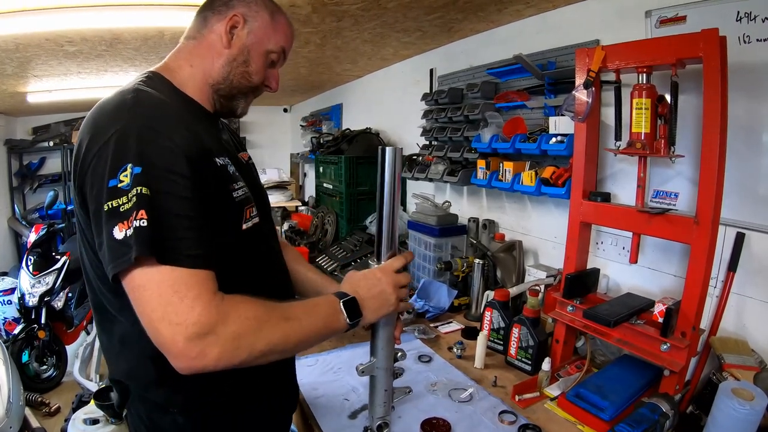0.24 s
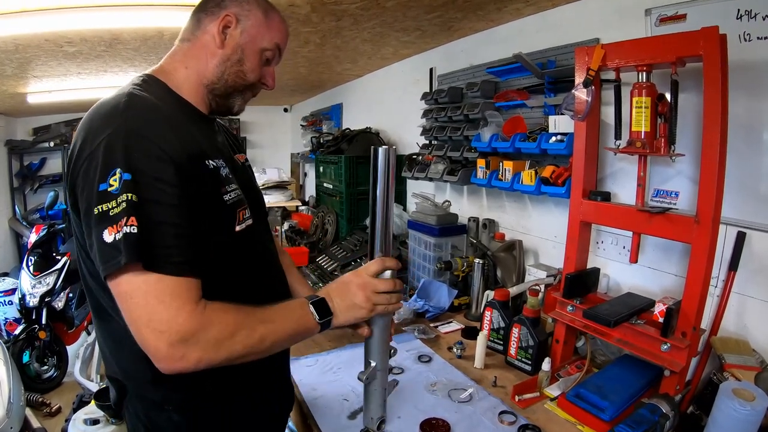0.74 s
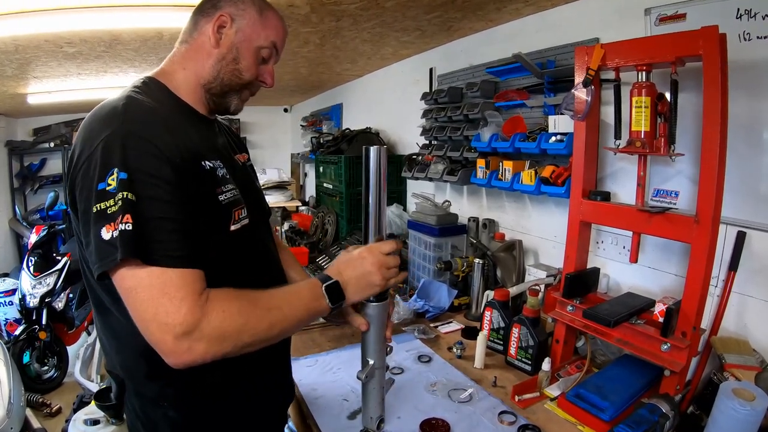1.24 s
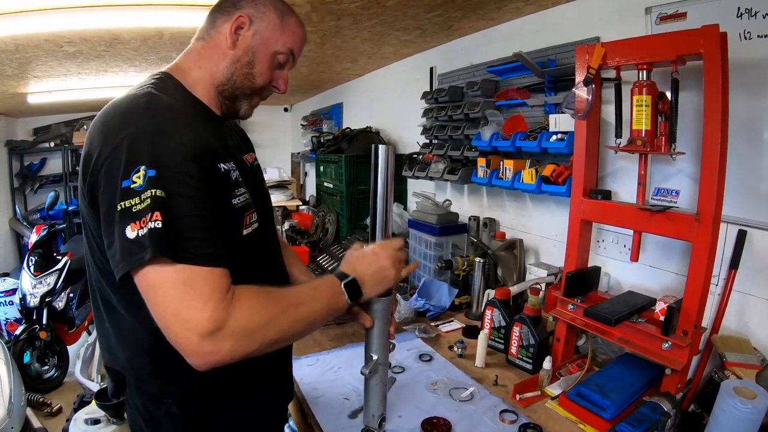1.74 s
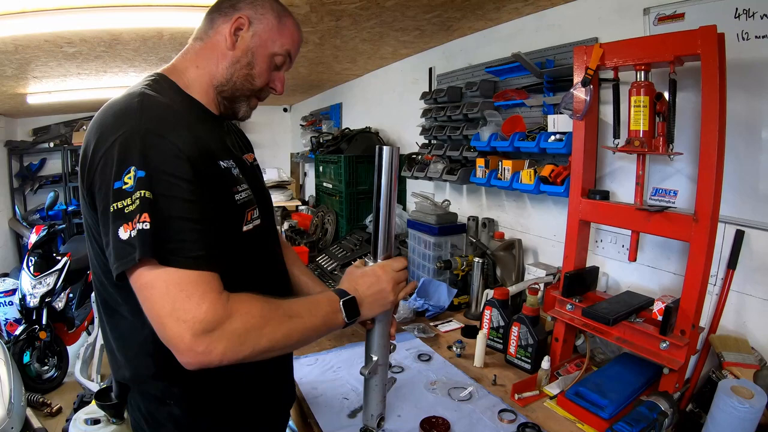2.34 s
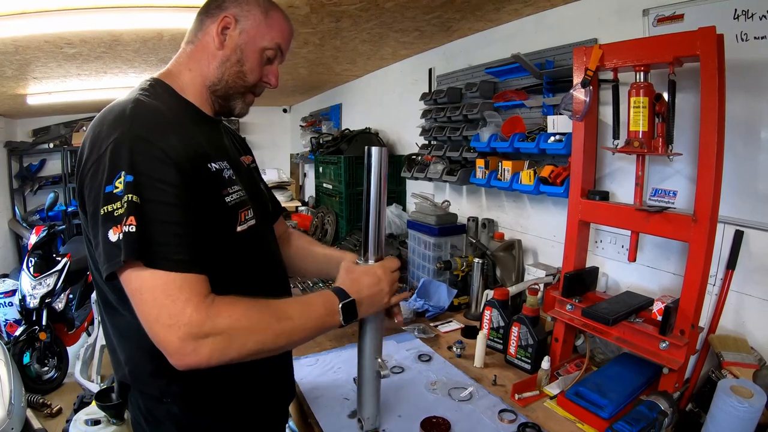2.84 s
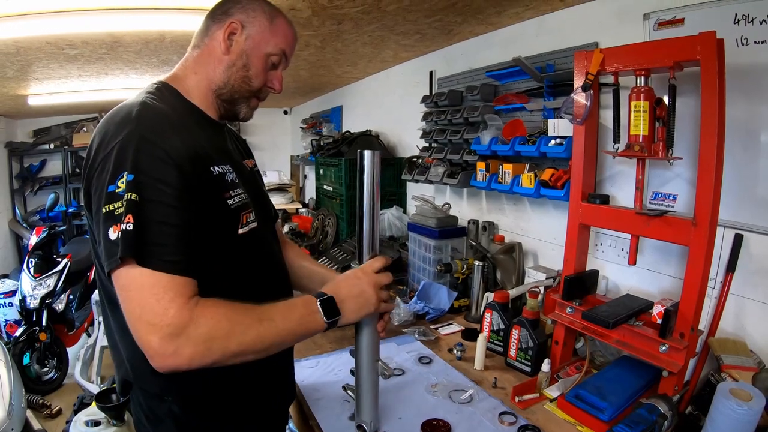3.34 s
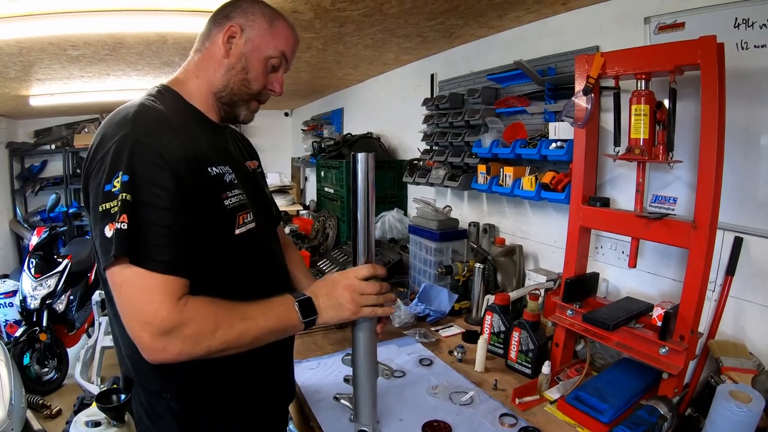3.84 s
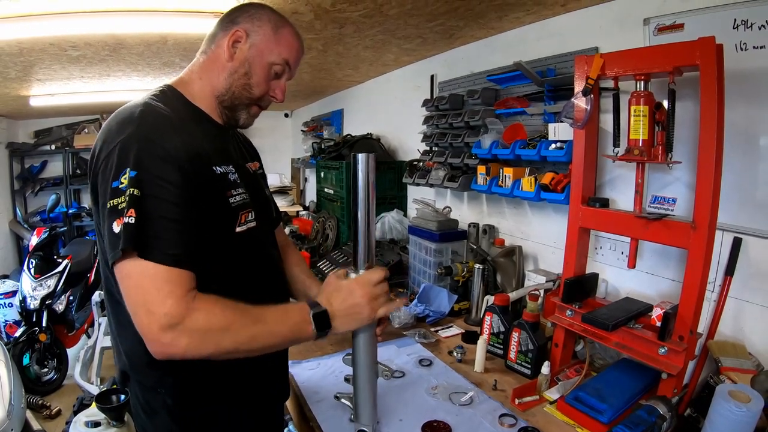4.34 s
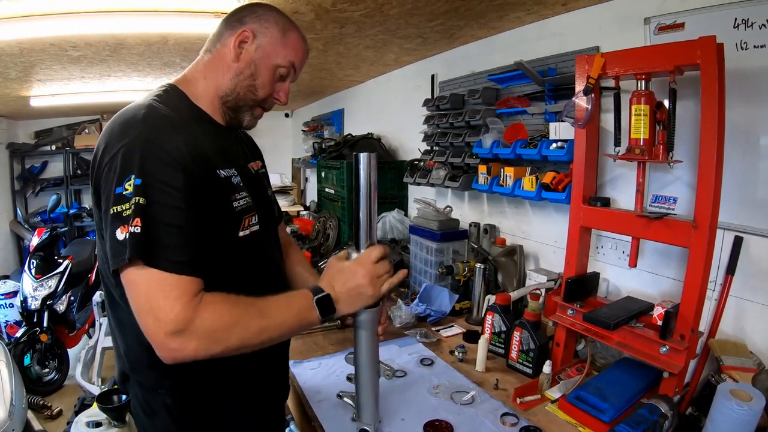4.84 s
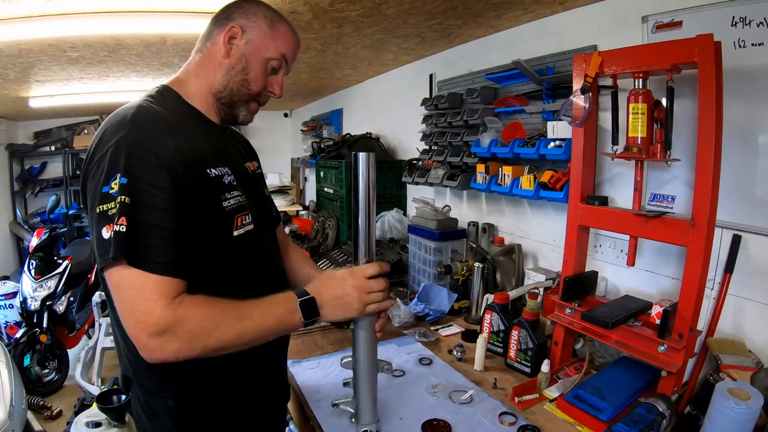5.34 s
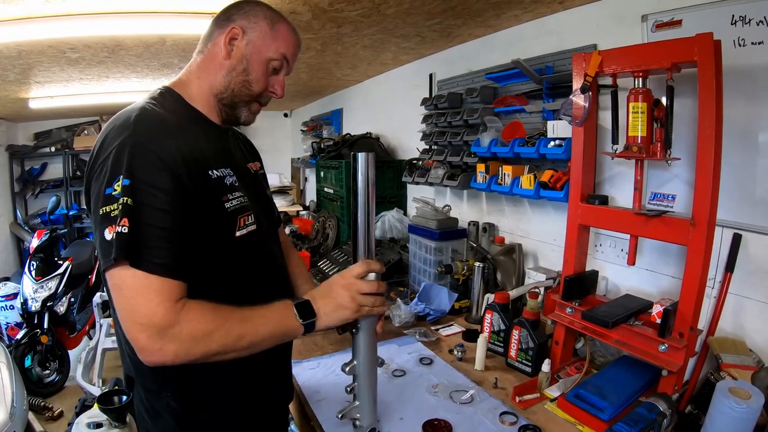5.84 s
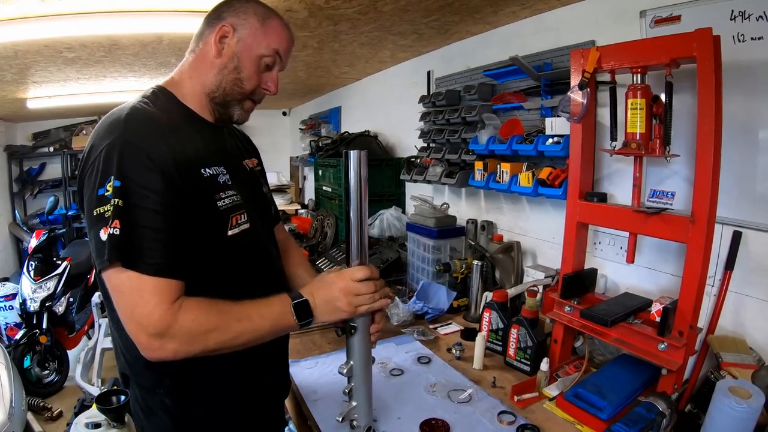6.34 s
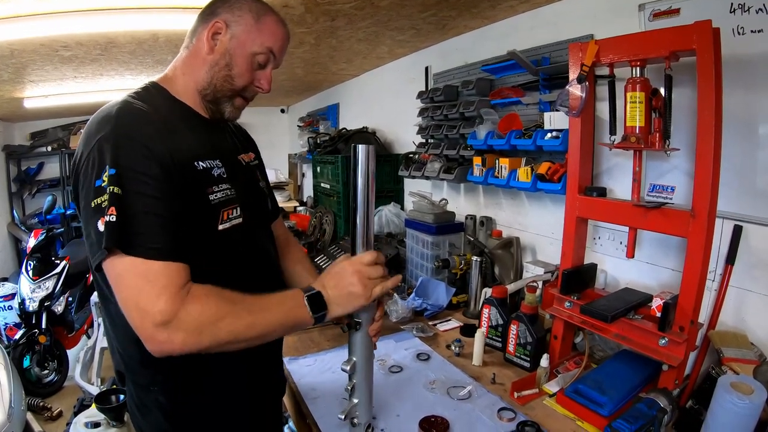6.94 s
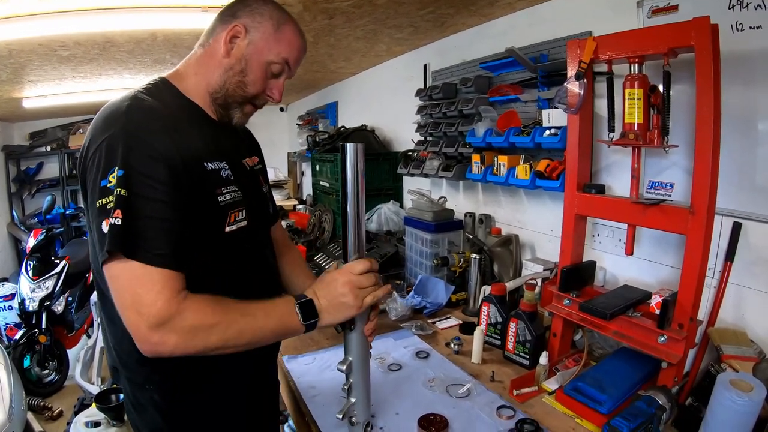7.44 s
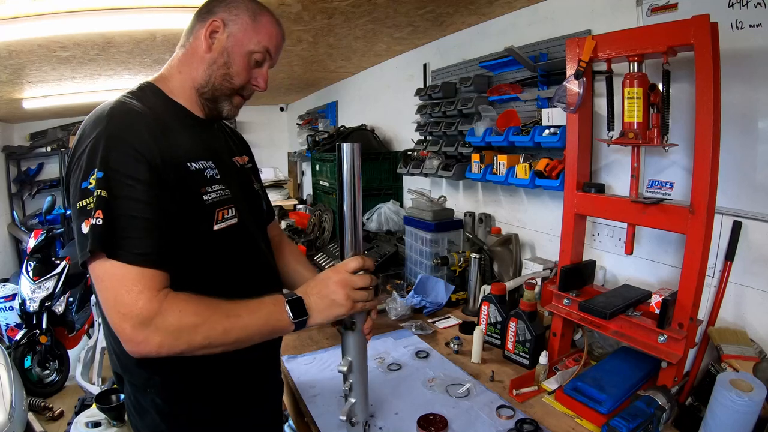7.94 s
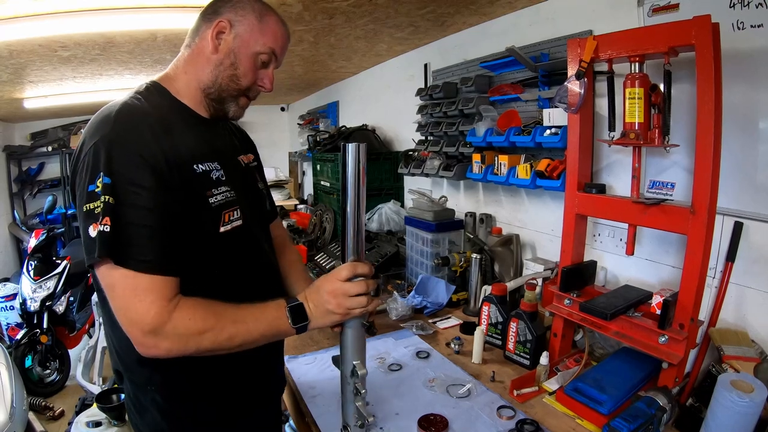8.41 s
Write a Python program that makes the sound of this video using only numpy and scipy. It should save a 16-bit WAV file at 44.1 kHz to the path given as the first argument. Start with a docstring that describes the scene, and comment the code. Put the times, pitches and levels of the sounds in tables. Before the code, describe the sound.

Hand tool work on a motorcycle fork: a tail of one slam and another hit, a pause, three quick slams, a lone softer one, three more, then two spaced hits. Each cracks sharply, thumps the bench and leaves a thin high ring. Metal rubs and clinks between; a tiny squeak comes near the end. Near microphone, small lively workshop.

```python
"""Driving a fork seal at the bench

A split metal seal driver is slid up a fork tube and slammed down on the seal; the fork stands on a wooden bench.
Each slam is a crack of shaped noise with ringing modes, a bench thump and a thin tube ring of decaying sines.
Upstrokes knock duller, the driver clinks and taps when handled: the same means, other colours and modes.
Hands rub on the metal and a finger squeaks, as swelling noise, over the low rumble of a small workshop."""
import sys
import numpy as np
from scipy import signal
from scipy.io import wavfile

SR = 44100
rng = np.random.default_rng(int(sys.argv[2]) if len(sys.argv) > 2 else 0)


def dump_mix(stems):
    """Bounce the given channels to the path in sys.argv[1] as a 16-bit WAV at rate SR."""
    frames = np.atleast_2d(stems).T  # one column per channel
    limited = np.clip(frames, -1, 1)  # hard clip at full scale
    pcm = np.round(limited * 32767).astype(np.int16)
    wavfile.write(sys.argv[1], SR, pcm)


N = 382655
LEAD = 4410   # samples run before time zero, so that a slam can fall just ahead of the start

# Slams on the seal; levels are relative, each source is trimmed later:
# start_s, blow_db, bench_thump_db, hardness_treble_db, tube_ring_db, leg_knock_db, favoured_pitch_hz
SLAM_CONTACTS = [(-0.07, -8.5, -17.5, -13, -51.5, -10, 6700), (0.24, -13.5, -21, -14.5, -53.5, -23.5, 1200),
                 (1.81, -13, -20, -12, -55.5, -17.5, 2220), (2.119, -13, -20.5, -13.5, -61, -29.5, 1240),
                 (2.414, -13, -21, -12.5, -61, -15.5, 1220), (3.367, -18.5, -25.5, -10, -47.5, -13, 640),
                 (4.546, -12, -18.5, -12, -48.5, -21.5, 2250), (4.831, -12.5, -21, -12.5, -49, -20, 1570),
                 (5.117, -13, -20.5, -12.5, -62, -15.5, 1575), (7.025, -12, -18, -11.5, -42.5, -20.5, 3100),
                 (7.615, -11, -20, -14.5, -38, -17, 1900)]
# Duller upstroke knocks, same columns
UPSTROKE_CONTACTS = [(0.168, -26.5, -27.5, -24, -62.5, -30.5, 964),
                     (2.033, -28.5, -30.5, -21.5, -67, -16, 960),
                     (2.334, -28.5, -28.5, -21.5, -61, -31, 990),
                     (4.763, -24.5, -26, -22, -61.5, -29.5, 990),
                     (5.061, -21.5, -25.5, -18.5, -67, -26.5, 925),
                     (7.528, -18.5, -21.5, -14, -38, -38, 1930)]
# Driver clinks on the tube, same columns
CLINK_CONTACTS = [(0.4095, -40.5, -65, -11, -75.5, -77, 6160),
                  (1.1605, -35.5, -54.5, -18.5, -68, -63, 2900), (3.3346, -39, -58, -10, -71, -56, 3040),
                  (4.4351, -27.5, -50.5, -10.5, -75.5, -65, 1960),
                  (5.407, -50.5, -58, -7.5, -71.5, -55, 5560), (5.6157, -40, -57.5, -6.5, -70.5, -54, 5620),
                  (6.9102, -19, -41.5, -4.5, -58.5, -43, 5800)]
# Soft dull taps on the slider, same columns
TAP_CONTACTS = [(1.174, -47, -50, -27, -75, -51, 740), (1.7376, -48, -66, -21, -75, -61, 1280),
                (4.048, -53, -56.5, -25.5, -80, -43, 874), (4.2316, -50.5, -70, -14.5, -75, -63.5, 1590),
                (6.362, -60, -53, -24.5, -75.5, -56, 700)]
# Colour of the dull contacts, upstrokes and taps: pitch_hz, density_db_per_hz
DULL_COLOUR = [(210, -37.5), (350, -2), (646, -2.5), (1020, -1.5), (1190, -5), (1400, -22), (1960, -1),
               (2240, -16.5), (3220, -18), (4190, -27.5), (5780, -24), (9780, -39.5), (11500, -64),
               (14900, -102), (22000, -120)]
# Modes of the cast slider, rung by slams, upstrokes and taps: pitch_hz, level_db, t60_s, sign
SLIDER_MODES = [(656.6, 0.5, 0.11, 1), (862, -8, 0.24, -1), (970, -1.5, 0.043, 1), (1192.4, -4.5, 0.12, -1),
                (1317, -6, 0.13, 1), (1714, -6, 0.044, -1), (1902, -6, 0.11, 1), (2205, -7.5, 0.14, -1),
                (3092, -3.5, .04, 1), (4490, -10.5, 0.04, -1), (5440, -9, 0.058, 1), (6840, -18.5, .03, -1),
                (7500, -16.5, 0.036, 1), (8160, -19, .03, -1)]


def amp(db):
    """Gain of a level in dB."""
    return 10 ** (np.asarray(db) / 20)


def rms_one(x):
    """Scale to rms 1."""
    return x / np.sqrt(np.mean(x ** 2) + 1e-20)


def at_hz(points, hz):
    """Read a spectrum on a log-frequency axis."""
    table = np.array(points)
    return np.interp(np.log(hz), np.log(table[:, 0]), table[:, 1])


def bands():
    """Third-octave band-passes with their centres, from 25 Hz up."""
    edges = 25 * 2 ** (np.arange(29) / 3)
    return [(np.sqrt(low * high), signal.butter(2, [low, high], "band", fs=SR, output="sos"))
            for low, high in zip(edges, edges[1:])]


def drift(rate_hz):
    """Slow random wander of spread 1: noise through two equal low-pass poles, drawn every 40 samples."""
    r = np.exp(-80 * np.pi * rate_hz / SR)
    draws = rng.standard_normal(N // 40 + 2002)
    slow = signal.lfilter([1], [1, -2 * r, r * r], draws)[2000:]   # skip the filter's start
    return np.interp(np.arange(N) / 40, np.arange(len(slow)), rms_one(slow))


def stereo(mid, side, hz):
    """One band at the stereo microphone: the side signal sets its width, a level difference its lean."""
    # Stereo width: pitch_hz, side_against_mid_db
    width = [(60, -26), (110, -23.5), (190, -23), (340, -14.5), (610, -5.5), (1090, -1), (1940, -2),
             (3460, -7.5), (6180, 0), (11000, 1)]
    # Balance: pitch_hz, left_against_right_db
    lean = [(60, 2.5), (110, 6.5), (190, 6.5), (340, -2.5), (610, -0.5), (1090, -1), (1940, -1.5),
            (3460, 0), (6180, -2.5), (11000, 1)]
    wide = amp(at_hz(width, hz)) * side
    half_lean_db = at_hz(lean, hz) / 2
    return np.array([mid + wide, mid - wide]) * amp(half_lean_db * np.array([[1], [-1]]))


def coloured(spectrum, patchy_db):
    """Stereo noise of rms 1, summed from bands that flicker partly together and partly alone."""
    white, together, out = rng.standard_normal((2, 2, N)), drift(8), 0
    for k, (hz, sos) in enumerate(bands()):
        flicker_db = patchy_db * (together + drift(14))
        noise = stereo(*signal.sosfilt(sos, white[k % 2]), hz)
        out = out + amp(at_hz(spectrum, hz) + flicker_db) * noise
    return rms_one(out)


def resonant_noise(peaks):
    """Noise of rms 1 heard through a few narrow resonances, each filtered twice."""
    out = 0
    for hz, width_hz, db in peaks:
        r = np.exp(-np.pi * width_hz / SR)
        poles = [1, -2 * r * np.cos(2 * np.pi * hz / SR), r * r]
        once = signal.lfilter([1, 0, -1], poles, rng.standard_normal(N))
        out = out + amp(db) * rms_one(signal.lfilter([1, 0, -1], poles, once))
    return rms_one(out)


def strike(rows, levels_db, modes, spread_db, tilt_db=0.0, favoured_hz=1.0):
    """One click train rings every damped mode, with a little chance in each strength; tilt is dB per octave."""
    # the spot that is struck lifts the modes near its favoured pitch
    favour_db, favour_octaves = 6, 0.11
    at = (np.array(rows)[:, 0] * SR).astype(int) + LEAD
    chance_db, out = rng.normal(0, spread_db, (len(rows), len(modes))), 0
    for k, (hz, db, t60, sign) in enumerate(modes):
        spot_db = favour_db * np.exp(-(np.log2(hz / favoured_hz) / favour_octaves) ** 2)
        mode_tilt_db = tilt_db * np.log2(hz / modes[0][0])
        clicks = np.full(N + LEAD, 1e-18)
        clicks[at] = amp(levels_db + db + spot_db + mode_tilt_db + chance_db[:, k]) * np.sign(sign)
        r, w = amp(-60 / (t60 * SR)), 2 * np.pi * hz / SR
        out = out + signal.lfilter([0, np.sin(w)], [1, -2 * r * np.cos(w), r * r], clicks)
    return out


def cracks(rows, colour, t60):
    """Each contact as a coloured noise burst (near sound) and one clean click of like energy (fills the room)."""
    favour_db, favour_octaves = 4, 0.2   # lift of the near crack around the favoured pitch
    start_s, crack_db, _, treble_db = np.transpose(rows)[:4]
    favoured_hz = np.array(rows)[:, 6:]
    length = 4096   # samples
    burst = rng.standard_normal((2, len(rows), length)) * amp(-60 * np.arange(length) / SR / t60)
    click_size = np.sqrt(np.sum(burst ** 2) / burst[..., 0].size)
    click = click_size * (np.arange(length) == 0) * np.ones((len(rows), 1))
    hardness_db = (treble_db - treble_db.mean())[:, None]   # a harder contact is brighter above 3 kHz
    near_only = np.array([1, 0])[:, None, None]
    shaped = 0
    for k, (hz, sos) in enumerate(bands()):
        spot_db = favour_db * np.exp(-(np.log2(hz / favoured_hz) / favour_octaves) ** 2) * near_only
        gain = amp(at_hz(colour, hz) + hardness_db * (hz > 3000) + spot_db)
        shaped = shaped + gain * signal.sosfilt(sos, [burst[k % 2], click * (-1) ** k])
    shaped = shaped / np.sqrt(np.mean(shaped[0, :, :512] ** 2))   # rms 1 over the near onsets
    out = np.zeros((2, N + LEAD + length))
    for k, start in enumerate((start_s * SR).astype(int) + LEAD):
        out[:, start:start + length] += amp(crack_db[k]) * shaped[:, k]
    return out[:, :N + LEAD]


def knocks(rows, colour, t60, crack_db, modes, ring_db, tilt_db):
    """Airborne part of a contact: the crack and the short ring of the struck part; the loose driver bounces twice."""
    chance_db = 3.5   # spread of mode strengths from touch to touch
    table = np.array(rows)
    blow_db, treble_db, favoured_hz = table[:, 1], table[:, 3], table[:, 6]
    tilt = tilt_db + (treble_db - treble_db.mean()) * 0.46   # high modes follow hardness
    ring = strike(table, blow_db + ring_db, modes, chance_db, tilt, favoured_hz)
    for late_s, bounce_db in [(0.005, -1.5), (0.012, -9)]:
        bounce = table[:, :1] + late_s * rng.uniform(0.51, 1.4, (len(table), 1))
        ring += strike(bounce, blow_db + ring_db + bounce_db, modes, chance_db, tilt, favoured_hz)
    return amp(crack_db) * cracks(rows, colour, t60) + ring


def slams():
    """The driver slams on the seal: a short hard crack and the ring of the cast slider."""
    # Slam colour: pitch_hz, density_db_per_hz
    slam_colour = [(210, -30), (350, 0), (449, -3.5), (973, -9), (1210, -8.5), (1490, -11.5), (2210, -15.5),
                   (2670, -22), (3130, -13.5), (3520, -21), (4190, -23.5), (8330, -19.5), (11500, -36.5),
                   (14900, -75.5), (22000, -120)]
    return knocks(SLAM_CONTACTS, slam_colour, t60=0.063, crack_db=-5.5,
                  modes=SLIDER_MODES, ring_db=-18.0, tilt_db=0.0)


def bench(rows, tilt_db):
    """Contacts knock the fork leg, then thump the bench modes; a softer push favours the low ones."""
    # Bench top and fork leg: pitch_hz, level_db, t60_s, sign
    bench_modes = [(59, -6, 0.4, -1), (71.4, -8.5, 0.93, 1), (82.24, 1.5, 0.38, 1), (101.75, -1.5, 0.35, 1),
                   (117.95, -3.5, 0.49, -1), (134.7, -1.5, 0.49, -1), (154.7, -4.5, 0.4, -1),
                   (175.2, -1, 0.33, 1), (201.6, -4, 0.41, 1), (216.4, -0.5, 0.27, -1),
                   (245.2, 8.5, 0.078, -1), (294.2, -13.5, 0.5, -1), (316, -18, 0.21, 1),
                   (347.6, -22.5, 0.37, 1), (384.4, -31, .27, 1), (416, -7, 0.055, -1),
                   (436.2, -4.5, 0.093, -1), (493, -22, 0.084, 1), (635, -18, 0.044, -1),
                   (639, -22, 0.24, 1)]
    # Short knock of the fork leg: pitch_hz, level_db, t60_s, sign
    leg_modes = [(208, -4.5, 0.0077, 1), (427, -11, 0.05, -1)]
    bench_delay_s = 0.003045   # the blow needs this long to push through fork and foot
    table = np.array(rows)
    thump = strike(table[:, :1] + bench_delay_s, table[:, 2], bench_modes, 1.0, tilt_db)
    leg_knock = strike(table[:, :1] + 0.0018, table[:, 5], leg_modes, 0.5)
    return signal.sosfilt(signal.butter(2, 1200, fs=SR, output="sos"), thump + leg_knock)


def tube():
    """The long fork tube keeps a thin ring of decaying sines; the next slam or upstroke stops it and starts its own."""
    # Ring of the tube: pitch_hz, level_db, t60_s
    tube_modes = [(2718, -4, 1.55), (3591, -25, 1.1), (6690, -30, 1.0)]
    grip_s, grip_db_per_s = 7.28, 68.5   # a hand closes round the tube and damps its ring
    t, out = np.arange(N) / SR, np.zeros(N)
    blows = np.sort([row[0] for row in SLAM_CONTACTS + UPSTROKE_CONTACTS] + [N / SR])
    contacts = np.array(SLAM_CONTACTS + UPSTROKE_CONTACTS + CLINK_CONTACTS)
    for start_s, ring_db in contacts[:, [0, 4]]:
        end_s = blows[blows > start_s][0]
        now = (t >= start_s) & (t < end_s)
        age_s = t[now] - start_s
        grip_db = grip_db_per_s * np.maximum(t[now] - grip_s, 0) * (start_s < grip_s < end_s)
        for hz, db, t60 in tube_modes:
            out[now] += amp(ring_db + db - grip_db - 60 * age_s / t60) * np.sin(2 * np.pi * hz * age_s)
    return out * amp([[-1.5], [1.5]])   # leans right


def workshop(near, filling, wet_db, gap_s):
    """Direct sound, one sample earlier on the left, plus a dense noise tail that dies band by band."""
    # Decay of the room: pitch_hz, t60_s
    room_t60 = [(50, 1), (130, 0.29), (350, 0.36), (920, 0.4), (2430, 0.38), (6400, 0.36)]
    t = np.arange(SR * 3 // 4) / SR
    white, response = rng.standard_normal((2, 2, len(t))), 0
    for k, (hz, sos) in enumerate(bands()[10:]):   # from about 250 Hz up
        tail_db = wet_db - 2.14 * np.log2(hz / 1000) - 60 * t / at_hz(room_t60, hz)
        envelope = amp(tail_db) * (1 - np.exp(-t / gap_s))   # the tail builds up over the gap
        response = response + stereo(*signal.sosfilt(sos, white[k % 2]) * envelope, hz)
    direct = np.array([near[LEAD:], near[LEAD - 1:-1]]) * amp([[-1.2], [1.2]])
    return direct + signal.oaconvolve(filling[None], response, axes=1)[:, LEAD:LEAD + N]


def room_background():
    """Low rumble and drone as resonant noise, and a broad room tone, each following its own level over time."""
    # Room between the knocks: time_s, rumble_db, drone_db, tone_db
    room_levels = [(0.55, -47, -60, -60), (0.96, -56.5, -64, -57), (1.27, -46.5, -63, -58),
                   (1.65, -49, -66, -54.5), (2.749, -47, -60.5, -59.5), (3.03, -57, -73, -57.5),
                   (3.299, -59.5, -62, -59), (3.749, -75, -65.5, -59), (4.1, -58, -58.5, -56),
                   (4.35, -69, -68.5, -55.5), (5.5, -51, -64.5, -59.5), (5.9, -53.5, -69, -61.5),
                   (6.36, -48, -69, -55), (6.76, -59, -65.5, -54.5), (7.45, -47.5, -60, -57),
                   (8.0, -56, -60, -60.5), (8.3, -58, -66.5, -58), (8.677, -66.5, -67, -57)]
    # Low rumble: pitch_hz, width_hz, level_db
    rumble_peaks = [(62, 17, -6.5), (87.7, 3.1, 1), (101, 5.8, -9.5)]
    # Drone: pitch_hz, width_hz, level_db
    drone_peaks = [(202.9, 9.4, 1.5), (240, 55, -13.5), (283, 11, -9.5), (387, 23, -8)]
    # Room tone: pitch_hz, density_db_per_hz
    tone_colour = [(15, -42), (25, -7), (64, -2), (94, -1.5), (141, -12), (207, -9), (505, -24), (740, -17),
                   (2270, -27), (2780, -28.5), (8100, -47), (9930, -58), (11000, -66.5), (14300, -91),
                   (22000, -120)]
    time_s, rumble_db, drone_db, tone_db = np.transpose(room_levels)

    def level(db):
        """Gain over time, drawn straight in dB between the points."""
        return amp(np.interp(np.arange(N) / SR, time_s, db))

    rumble = level(rumble_db) * resonant_noise(rumble_peaks)
    drone = level(drone_db) * resonant_noise(drone_peaks)
    tone = level(tone_db) * coloured(tone_colour, patchy_db=0.7)   # nearly steady
    return rumble + drone + tone


def upstrokes():
    """Duller knocks of the upstroke: a longer, softer crack and the slider's ring with its top held down."""
    return knocks(UPSTROKE_CONTACTS, DULL_COLOUR, t60=0.11, crack_db=-4.0,
                  modes=SLIDER_MODES, ring_db=-9, tilt_db=-4.0)


def clinks():
    """The driver clinks on the tube: a light crack and the short ring of its two halves."""
    # Clink colour: pitch_hz, density_db_per_hz
    clink_colour = [(290, -50.5), (500, -23.5), (1520, -15), (2010, 0.5), (2480, -14), (4530, -15),
                    (5890, -17.5), (6540, -26), (10600, -27.5), (11500, -75.5), (14900, -105),
                    (22000, -120)]
    # Driver halves, damped by the hand: pitch_hz, level_db, t60_s, sign
    driver_modes = [(1260, -19.5, .05, 1), (1820, 0.5, 0.048, -1), (1926, -1.5, 0.028, 1),
                    (2090, 2, 0.057, -1), (2890, -7, 0.097, 1), (3380, -8, 0.079, -1),
                    (3880, -13.5, 0.062, 1), (4600, -25, 0.081, -1), (5560, -4, 0.065, 1),
                    (5680, -8.5, 0.13, -1), (5857, -3, 0.086, 1), (6120, -7, 0.066, -1),
                    (6200, -12, .06, 1)]
    return knocks(CLINK_CONTACTS, clink_colour, t60=0.11, crack_db=-12.0,
                  modes=driver_modes, ring_db=-10, tilt_db=-2.0)


def strokes():
    """Gains of rub and singing: each stroke swells and fades like a bell curve."""
    # Hands and driver rub along the tube: loudest_s, rise_s, fall_s, rub_db, metal_singing_db
    rub_strokes = [(0.841, .05, 0.06, -70.5, -82), (1.26, 0.033, .04, -66, -84),
                   (1.5, 0.14, 0.13, -63.5, -83), (1.792, 0.044, 0.057, -50, -78.5),
                   (3.3, 0.11, .03, -73.5, -82), (3.8, 0.07, 0.038, -67, -83),
                   (3.87, 0.025, .02, -64.5, -85), (4.179, 0.021, 0.027, -72, -80),
                   (4.33, 0.086, 0.069, -57.5, -74), (6.06, 0.052, 0.073, -60, -82.5),
                   (6.37, 0.036, 0.052, -71, -68.5), (6.6, 0.07, 0.074, -65, -63.5),
                   (6.76, 0.086, 0.086, -54, -61), (7.31, 0.063, .06, -75, -69.5),
                   (7.46, 0.059, 0.12, -68, -75), (8.21, 0.053, 0.082, -59, -85), (8.6, 0.11, .1, -68, -70)]
    rub_floor_db, sing_floor_db = -86.5, -86   # the grip is never quite still
    t, rub, sing = np.arange(N) / SR, amp(rub_floor_db), amp(sing_floor_db)
    for loudest_s, rise_s, fall_s, rub_db, sing_db in rub_strokes:
        swell = np.exp(-((t - loudest_s) / np.where(t < loudest_s, rise_s, fall_s)) ** 2)
        rub, sing = rub + amp(rub_db) * swell, sing + amp(sing_db) * swell
    return rub, sing


def rubbing():
    """Friction along the tube: broad coloured noise, with the metal singing as resonant noise."""
    # Rub colour: pitch_hz, density_db_per_hz
    rub_colour = [(710, -45), (1200, -16), (1560, -4.5), (1650, -5.5), (2480, -8), (3330, -3.5),
                  (4860, -12.5), (7580, -13), (8250, -14.5), (10400, -18.5), (11500, -36), (14900, -74),
                  (22000, -120)]
    # Metal singing under the rub: pitch_hz, width_hz, level_db
    singing_peaks = [(1680, 35, 0), (2260, 50, -6), (3020, 50, -5), (3410, 45, 0), (4380, 60, -3),
                     (8100, 120, -8)]
    rub_gain, sing_gain = strokes()
    return rub_gain * coloured(rub_colour, patchy_db=1.5) + sing_gain * resonant_noise(singing_peaks)


def taps():
    """Soft dull taps on the slider: a short dull crack and a little of its ring."""
    return knocks(TAP_CONTACTS, DULL_COLOUR, t60=0.055, crack_db=-6.0,
                  modes=SLIDER_MODES, ring_db=-11.5, tilt_db=-2.5)


def squeak():
    """A finger squeaks on the tube: a short swell of friction noise through a few resonances."""
    # The squeak: loudest_s, half_length_s, level_db
    scuff = (8.192, 0.019, -49.5)
    # Its resonances: pitch_hz, width_hz, level_db
    scuff_peaks = [(1490, 59, -11), (2170, 90, -4), (2494, 60, 4), (5450, 1600, -8)]
    loudest_s, half_s, db = scuff
    late_s = np.arange(N) / SR - loudest_s
    fade = np.where(late_s < 0, (late_s / half_s) ** 2, late_s / half_s / 1.15)   # bell rise, exponential fall
    return amp(db) * resonant_noise(scuff_peaks) * np.exp(-fade)


def scene():
    """Contacts in the room, bench, tube ring, squeak, rubbing and background."""
    near, filling = slams() + upstrokes() + clinks() + taps()
    thump = bench(SLAM_CONTACTS, tilt_db=2.0)
    thump = thump + bench(UPSTROKE_CONTACTS + CLINK_CONTACTS + TAP_CONTACTS, tilt_db=-2.0)
    room = workshop(near, filling + amp(-8.0) * thump, wet_db=-31.5, gap_s=0.01)
    direct_thump = thump[LEAD:] * amp([[-0.25], [0.25]])
    return room + direct_thump + tube() + squeak() + room_background() + rubbing()


def record(dry):
    """Peaks are rounded by a soft curve, then the top is cut by a steep low-pass."""
    stop_hz = 11650 * 1.15   # 45 dB down from here up
    rounded = 1.8 * np.tanh(dry / 1.8)
    return signal.sosfilt(signal.cheby2(6, 45, stop_hz, fs=SR, output="sos"), rounded)


dry = scene()
out = record(dry)
dump_mix(out)
```